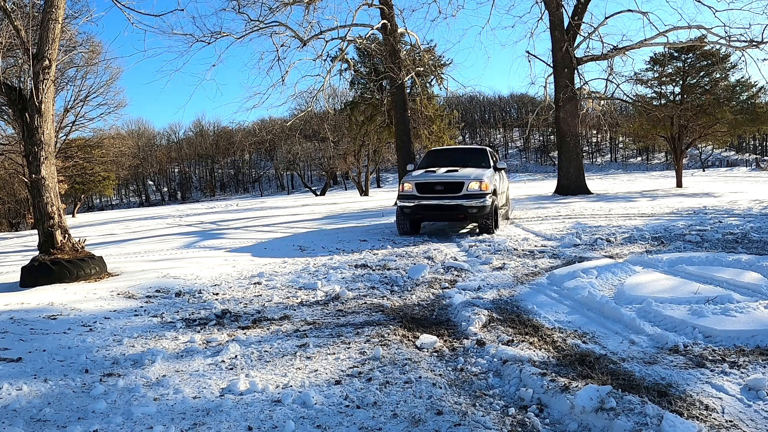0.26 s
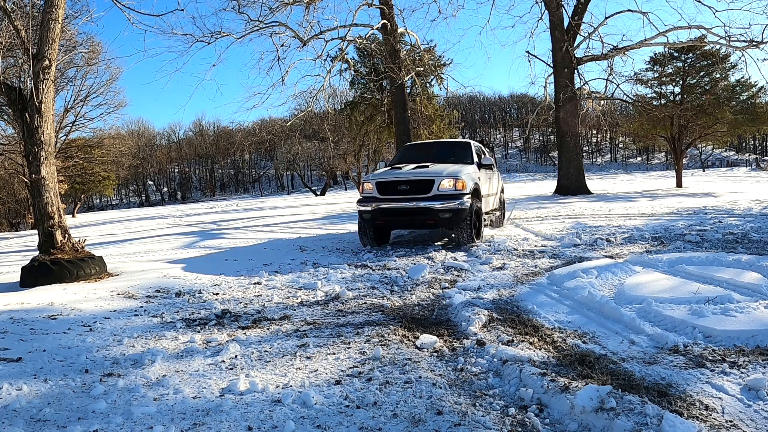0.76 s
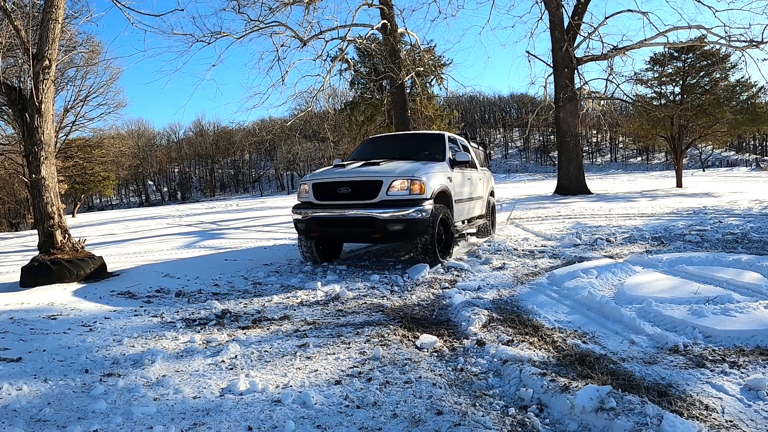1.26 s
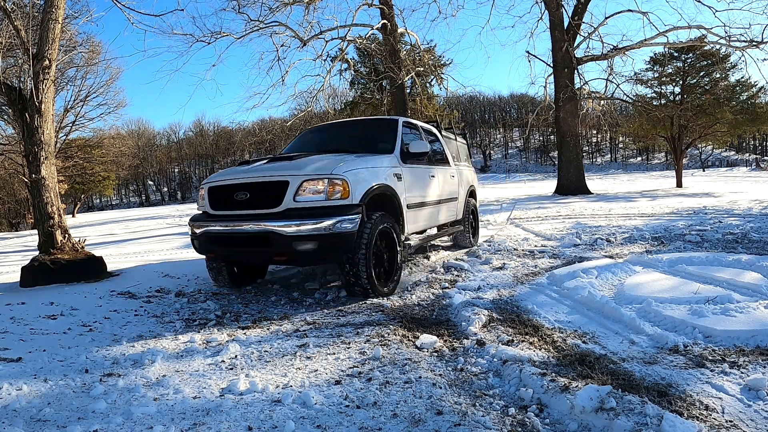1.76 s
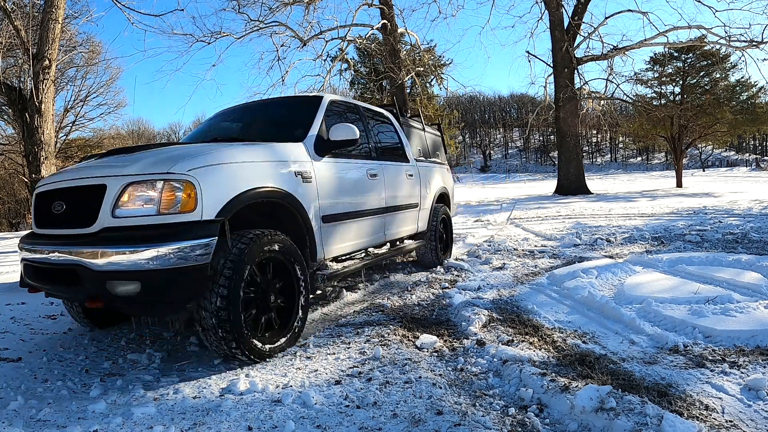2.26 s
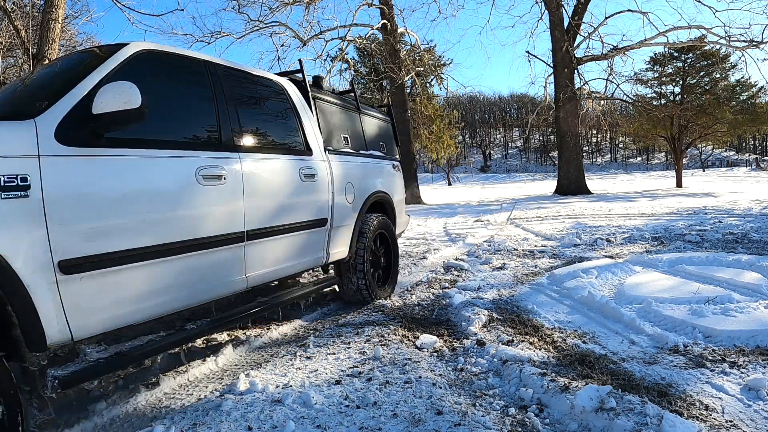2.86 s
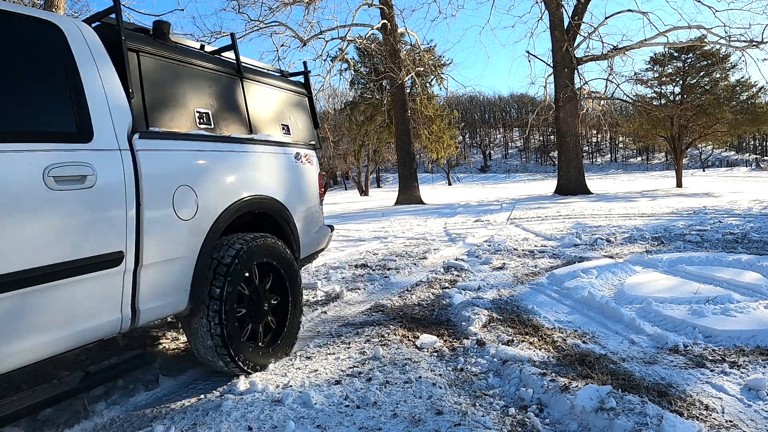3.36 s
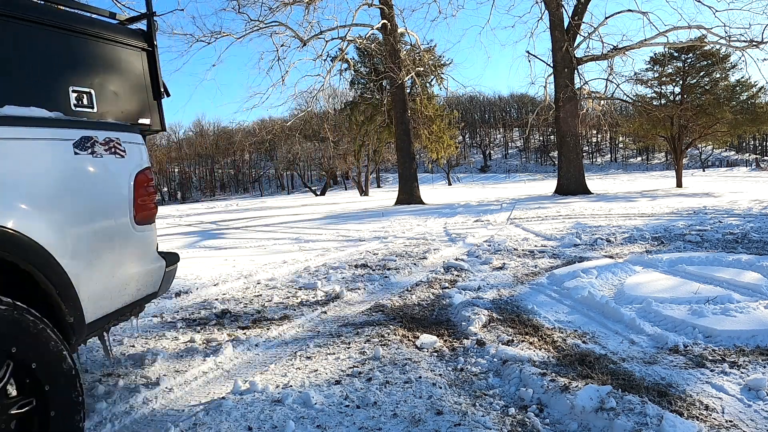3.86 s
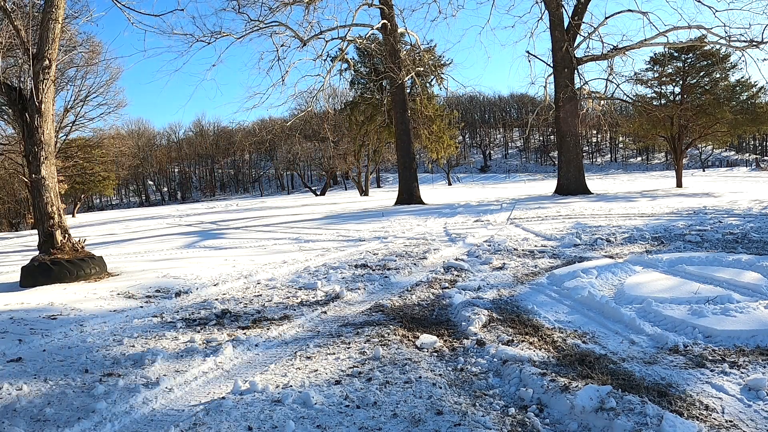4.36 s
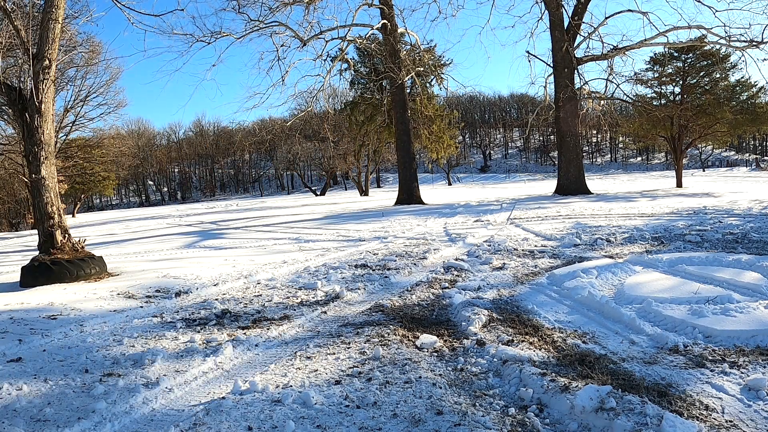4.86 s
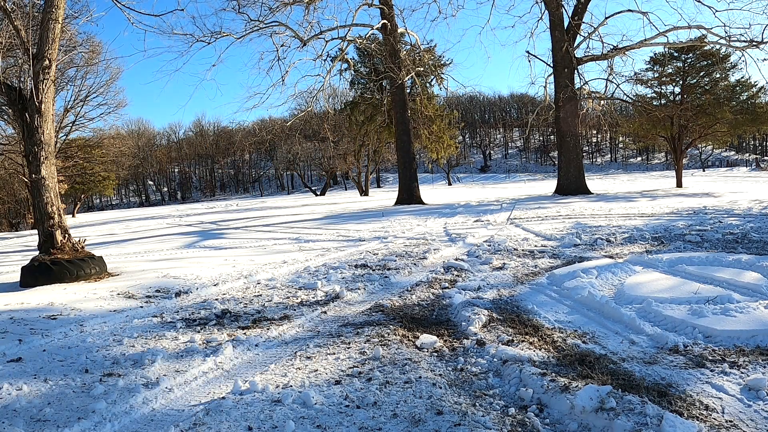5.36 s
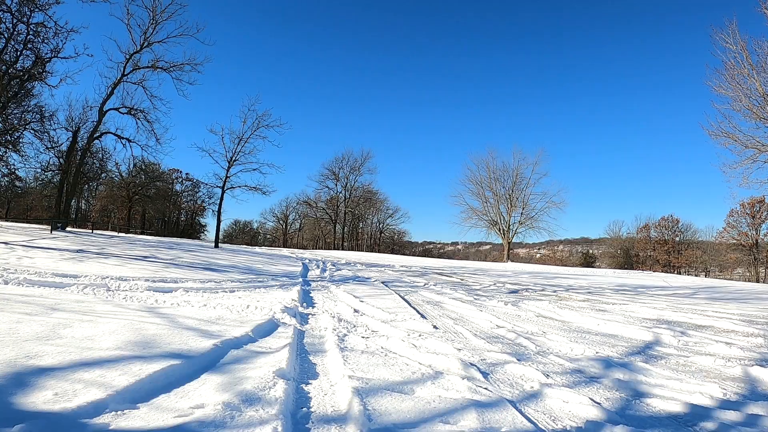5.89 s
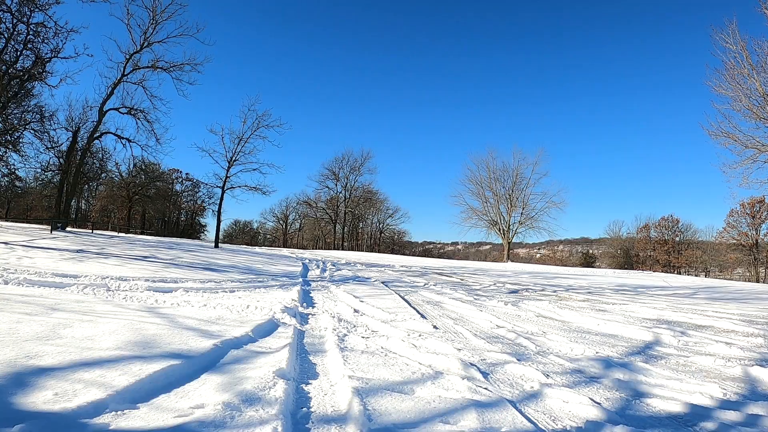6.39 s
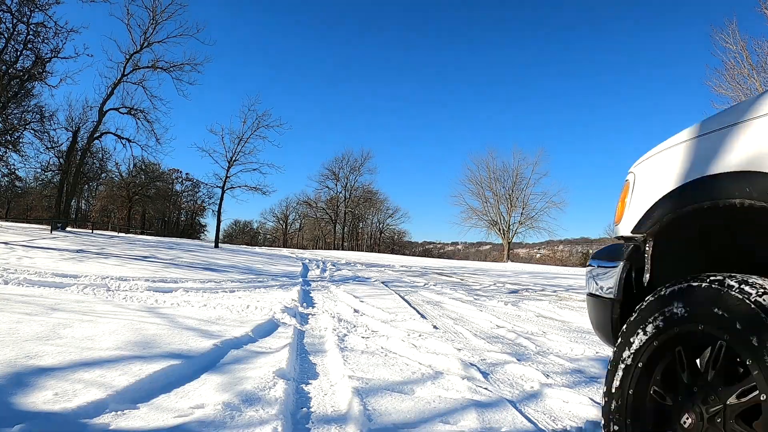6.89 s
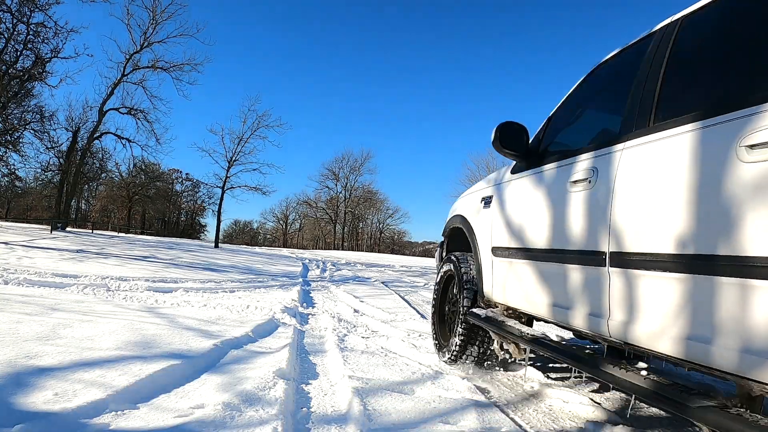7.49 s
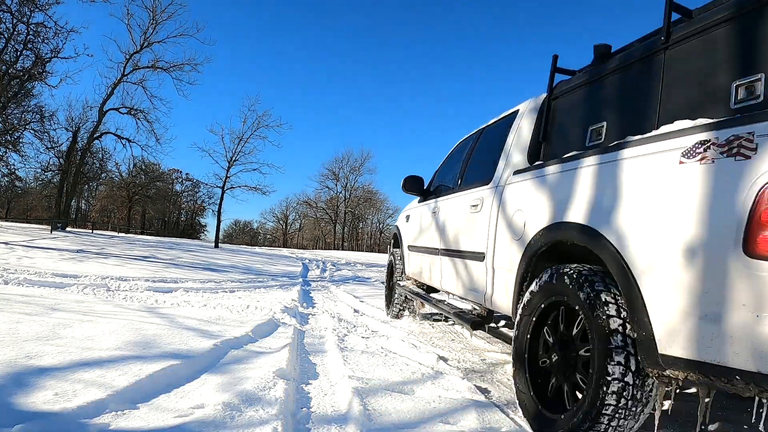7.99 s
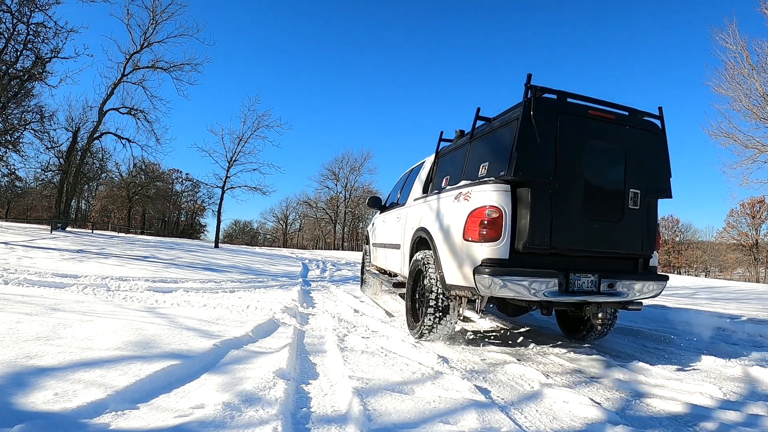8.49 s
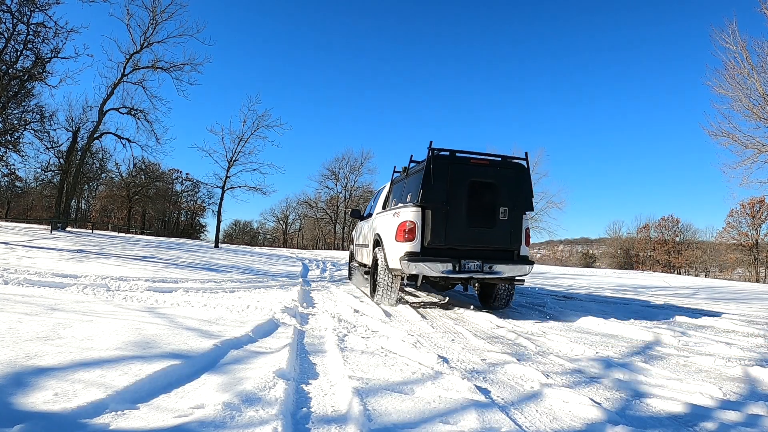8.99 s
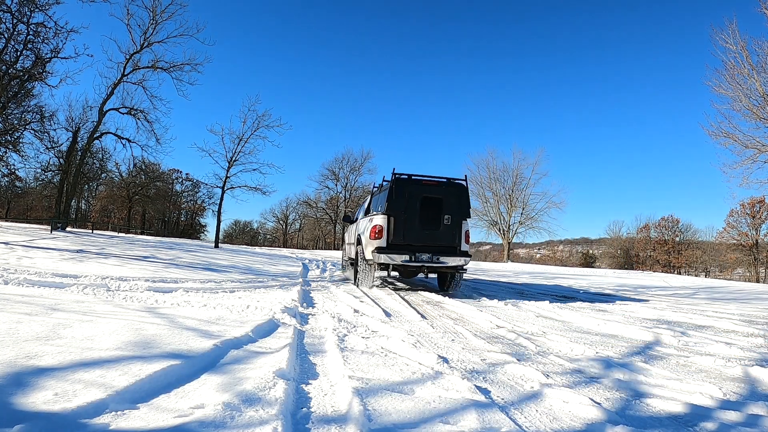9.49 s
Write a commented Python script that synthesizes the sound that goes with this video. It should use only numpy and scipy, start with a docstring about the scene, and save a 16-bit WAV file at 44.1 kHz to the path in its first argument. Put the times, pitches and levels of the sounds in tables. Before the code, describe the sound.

Outdoors on packed snow, a V8 pickup approaches with low exhaust burble, intake drone and gritty tyre crunch. Short raspy wheel squeaks come just before it passes very close to a stereo microphone and moves left. After a brief dip, a second, slightly wider pass swells quickly, with groaning tyres, ice ticks and suspension clacks, then recedes with the engine note falling.

```python
"""At the start a V8 pickup creeps up over packed snow: exhaust burble, intake drone, bay whirr, tyre groan and crunch.
Snow squeals come before 3 s, faint low thumps up to 6 s, ice cracks throughout; a wheel rasps in squeaks from 2 s.
At 3 s the front axle passes about 1.2 m from two close microphone ports; near 5.8 s the level dips briefly.
A second pass follows, abreast at 6.9 s and 2 m off, with suspension clacks after 7 s.
Firing pulses, filtered noise, snow grains and ringing modes make the sounds; distance and bearing place them."""
import sys
import numpy as np
from scipy import signal
from scipy.fft import rfft, irfft, next_fast_len
from scipy.io import wavfile
from scipy.ndimage import map_coordinates

SR = 44100
rng = np.random.default_rng(int(sys.argv[2]) if len(sys.argv) > 2 else 0)


def log_audio(samples):
    """Write samples as a 16-bit WAV file to the path given in sys.argv[1]."""
    # one column per channel
    frames = np.atleast_2d(samples).T
    # limit to full scale, then quantise
    limited = np.clip(frames, -1, 1)
    pcm = np.round(limited * 32767).astype(np.int16)
    wavfile.write(sys.argv[1], SR, pcm)


N = 429534
TIME = np.arange(N) / SR
LEFT_RIGHT = np.array([[1], [-1]])

# path of each pass: front axle abreast t/s, speed/(m/s), closest distance/m
PATH_FIRST = (3.007, 2.78, 1.163)
PATH_SECOND = (6.894, 3.45, 2.01)
WHEELBASE_M = 3.5
# how each source carries: level by front axle/dB, level by rear axle/dB,
# loss per doubling of distance/dB, gain ahead and loss behind/dB
CARRY_FIRST = {"rumble": (-33.5, -39, 3.5, 0), "exhaust": (-31, -37.5, 1.5, -0.6),
               "intake": (-44.5, -78, 6.5, 25), "groan": (-27, -32, 6.5, 3.5),
               "bay": (-36.5, -41.5, 3.5, 7.5), "crunch": (-36.5, -43, 5.5, 6.5),
               "spray": (-42, -44, 9.5, 7.5), "hollow": (-39.5, -53, 4.5, 0.5)}
CARRY_SECOND = {"rumble": (-34.5, -34, 3, -5), "exhaust": (-25, -28, 2.5, 2.5), "intake": (-40, -74, 4, 19),
                "groan": (-22.5, -31.5, 13, 2.5), "bay": (-32.5, -40.5, 10, 7),
                "crunch": (-38.5, -46, 6, 7), "spray": (-50.5, -56.5, 5.5, 0.5),
                "hollow": (-29.5, -33.5, 20.5, -3)}
# bearing at the ports: t/s, left minus right level/dB, left lag/us,
# lean of the band around 1.3 kHz (share, + left), side stream against mid/dB
BEARING_FIRST = [(0, -1.5, 44, 0.013, -7), (2.45, 1, 10.5, 0.019, -10.5), (3.25, 10, -46, 0.088, -3.5),
                 (3.55, 4.5, 1, 0.056, -2.5), (3.87, 4.5, -9, 0.037, -8.5), (4.6, 14.5, -76, 0.37, -3.5),
                 (5.74, 11, -88, 0.85, -4.5)]
BEARING_SECOND = [(5.8, 0, 5, 0.19, -31), (6.4, 0, 11, -0.3, -35), (7.4, -3, 6, -0.26, -16),
                  (8.35, -1.5, -6, -0.74, -12.5), (8.9, -0.1, 1, 0.045, -30), (9.74, 0.1, 0, 0, -34)]
# patches of deeper, crustier or smoother snow: t/s, half length/s, roar/dB, crunch/dB, spray/dB
SNOW_PATCHES = [(0.45, 0.32, 1.2, 2, -1), (1.39, 0.045, -0.5, 1.5, -4), (1.7, 0.31, -1, 1.5, 5),
                (4.004, 0.18, 1.5, 2.5, 1.5), (4.498, 0.18, 1.5, 0.3, -2.5), (6.038, 0.25, 4.5, 5.5, 6),
                (6.152, 0.025, 2.5, -1.5, 0), (6.317, 0.055, 3.5, 0, 0.5), (6.462, 0.04, -1.5, -1.5, -2),
                (6.825, 0.18, -0.5, 3, 5), (6.835, 0.017, 3, -1, -1), (7.034, 0.028, 2, 0, 2),
                (7.094, 0.18, 1.5, 3, 3.5), (7.393, 0.027, -2, -1, 0), (8.06, 0.071, 4, 2, 2),
                (8.42, 0.17, 0, 2.5, -1), (8.87, 0.41, 1.5, 5, 0.5), (9.38, 0.35, -0.5, -3, 0),
                (9.566, 0.055, -16, 0.5, -1)]

# low rumble spectrum: f/Hz, level/dB
RUMBLE_TONE = [(6, -25), (15, -8), (25, 1), (42, 0), (65, 2.5), (85, -6), (130, -40)]
# three short echoes: lag/s
ECHO_LAGS_S = [0.0031, 0.0052, 0.0083]
# hollow ring under the body: f/Hz, width/Hz, level/dB
HOLLOW_MODES = [(523, 88, -7), (695, 78, -4), (780, 130, -1.5), (983, 93, 1.5), (1046, 73, -5.5)]
# faint low thumps: t/s, f/Hz, peak level/dB, rise/s
LOW_THUMPS = [(0.351, 127.7, -30, 0.086), (1.456, 117.7, -23, 0.046), (2.021, 117, -27, 0.028),
              (2.48, 142.6, -24.5, 0.088), (4.271, 109.7, -31, 0.037), (4.73, 47.6, -32, 0.09),
              (4.922, 113, -25, 0.009), (5.01, 124, -21, 0.0049), (5.821, 117.6, -23, 0.035),
              (6.04, 98, -22.5, 0.06)]
# suspension knocks: t/s, level/dB
KNOCKS = [(7.04, -25), (8.3, -29), (8.608, -24), (8.851, -32), (9.188, -38), (9.207, -36), (9.218, -36),
          (9.383, -42)]
# modes of the suspension: f/Hz, level/dB, decay/ms
SUSPENSION_MODES = [(220, 0, 8), (450, -4.5, 6), (680, -6, 6), (984.5, -3.5, 5), (1250, -10, 4.4),
                    (1700, -19, 2), (2600, -20, 1.5)]
# ice cracks under the tread: t/s, tick level/dB, low crack against tick/dB, decay/ms
ICE_CRACKS = [(0.925, -54, 9, 35), (1.228, -48, 9, 25), (1.499, -43.5, 10.5, 15), (1.609, -39, 5, 11),
              (4.326, -36, 5, 4.5), (5.892, -32.5, -9, 3.81), (5.979, -34, -8, 5.3), (6.659, -31, 7.5, 1.8),
              (7.046, -33, 3, 3.6), (7.072, -40, 3, 5), (8.608, -51, -6, 3), (8.963, -39, -7, 10),
              (9.442, -47, -18, 2.26), (9.58, -54, -1, 15.2), (9.628, -53, -12, 14.5)]
# packed snow squeals: t/s, length/s, f/Hz, glide/Hz, level/dB
SNOW_SQUEALS = [(0.738, 0.06, 3300, -100, -49), (1.352, 0.023, 5050, 150, -51),
                (1.366, .026, 4170, -1, -45), (1.362, 0.044, 1355, 0, -40), (1.72, 0.06, 3350, 270, -41.5),
                (2.817, 0.092, 1690, 31, -43)]
# wheel squeaks: t/s, length/s, rasp level/dB, singing level/dB, slip rate/Hz, swell start to end/dB
WHEEL_SQUEAKS = [(2.057, 0.027, -41, -41, 270, 0), (2.13, 0.028, -43, -36, 500, 0),
                 (2.189, 0.057, -32.5, -37, 260, -3), (2.21, 0.014, -37, -32, 390, -2),
                 (2.49, 0.053, -27, -34.5, 330, 5), (2.566, 0.023, -24, -34, 390, -5),
                 (2.592, 0.04, -27.5, -37, 220, -6), (2.706, 0.038, -29.5, -34.5, 260, -4)]
# modes of the wheel: f/Hz, width/Hz, level/dB
WHEEL_MODES = [(1500, 370, 5.5), (2270, 510, 3.5), (3200, 400, 3.5), (3660, 64, 13), (4120, 300, 3),
               (4870, 69, 6), (5230, 90, 2), (6060, 200, 3), (6480, 130, 1), (7470, 93, 9), (7780, 160, 3),
               (8040, 120, 2), (8450, 170, -9)]
SINGING_HZ = 3645  # the mode that the slips lock on to

# spectra of the tyre groan, snow crunch and icy spray: f/Hz, level/dB
GROAN_TONE_FIRST = [(130, 2.5), (235, 3.5), (320, 1), (400, -1.5), (480, -4.5), (600, -5.5), (750, -9),
                    (1100, -20.5), (2500, -59)]
GROAN_TONE_SECOND = [(130, -29), (235, 6.5), (320, 3), (400, 3), (480, 3), (600, -2.5), (750, -5),
                     (1100, -19), (2500, -31.5)]
CRUNCH_TONE_FIRST = [(900, -14), (2000, -1), (2800, -2.5), (3500, -0.5), (4300, -2.5), (5200, -8),
                     (6500, -8.5), (7500, -17), (9000, -17), (15000, -33.5)]
CRUNCH_TONE_SECOND = [(900, -10), (1250, 3.5), (1550, 4), (2000, -1.5), (2600, -3.5), (3200, -7.5),
                      (4400, -7.5), (5500, -16), (6500, -18), (9000, -56), (12000, -64.5)]
ICE_TONE_FIRST = [(5000, -2), (6800, -2), (7600, 2.5), (8200, -6), (9000, -28), (10500, -18),
                  (12500, -14.5), (14000, -38), (15500, -50)]
ICE_TONE_SECOND = [(4500, -9), (5800, -4), (6150, -1.5), (6450, 1), (7100, 4), (7500, -6.5), (8000, -10.5),
                   (10000, -20), (13000, -32), (14500, -40), (16000, -58)]
# spectra of the engine bay, intake and exhaust muffler: f/Hz, level/dB
BAY_TONE_FIRST = [(400, -18.5), (680, -5.5), (830, 1), (990, 0), (1130, 2.5), (1380, -1), (1750, -2.5),
                  (1880, -7.5), (3000, -17), (6000, -41)]
BAY_TONE_SECOND = [(400, -18.5), (740, -1), (850, 4), (985, -2.5), (1070, -1.5), (1170, -7.5),
                   (1350, -18.5), (2000, -25), (3000, -26), (6000, -59)]
INTAKE_TONE = [(70, -22), (100, 6), (122, 10.5), (145, -4), (220, -39.5), (380, -11), (440, -6), (490, -7),
               (570, -6.5), (900, -46)]
MUFFLER_FIRST = [(35, -37), (65, -1), (85, 0.5), (120, 1), (168, 1), (205, -5.5), (300, -18), (600, -30),
                 (1500, -62)]
MUFFLER_SECOND = [(35, -30), (65, -3), (90, 1), (120, 1.5), (165, 3), (235, -6), (320, -13), (600, -41),
                  (1500, -70)]
# eight firings of one engine cycle: strength/dB
CYLINDERS_DB = [0.5, -5.5, 0, -2, 1, -7.5, -2.5, -0.5]
# the engine: t/s, firing rate f/Hz, throttle 0-1
ENGINE_FIRST = [(0, 161, 0), (0.35, 160, 0.2), (0.7, 150, 0.1), (1.1, 167, 0.35), (1.45, 171, 0.47),
                (1.75, 156, 0.2), (2.2, 153, 0.14), (2.72, 151, 0.2), (2.95, 177, 0.6), (3.2, 175, 0.64),
                (3.6, 152.3, 0.22), (4.7, 155, 0), (5.2, 162.8, 0.92), (5.74, 166.1, 0.86)]
ENGINE_SECOND = [(5.799, 160.5, 0.033), (6.85, 158.2, 0.097), (7.25, 161.8, 0.76), (7.451, 152.7, 0.089),
                 (7.8, 150.1, 0.71), (8.1, 165.3, 0.59), (8.5, 159.1, 0.86), (8.75, 146.2, 0.72),
                 (9.15, 138.7, .1), (9.74, 132.1, 0.23)]
THROTTLE_DB = 6  # extra exhaust level at full throttle
LABOUR = 0.35  # share of the roar's change in dB that the exhaust follows
NOTE_DB, NOTE_THROTTLE_DB = -17, 16.5  # clean note against burble when coasting; its rise at full throttle
DRONE_DB = -13  # clean firing note of the intake against its gulping

CHANGE_S = 5.764  # the dip between the passes
TOP_HZ = 15200  # upper limit of the microphone


def undb(db):
    """Decibels to gain."""
    return 10 ** (np.asarray(db) / 20)


def unit(x):
    """Scale to rms 1."""
    return x / np.sqrt(np.mean(x ** 2) + 1e-18)


def curves(table):
    """Each column of a table as a value per sample."""
    s, *columns = np.transpose(table)
    return [np.interp(TIME, s, column) for column in columns]


def colour(x, points):
    """Filter by a spectrum of (Hz, dB) points; rms 1."""
    size = next_fast_len(N, True)
    hz, db = np.transpose(points)
    bins = np.maximum(np.arange(size // 2 + 1) * SR / size, 1)
    gain = undb(np.interp(np.log(bins), np.log(hz), db))
    # beyond the outer points the spectrum falls at 12 dB per octave
    gain *= np.minimum(bins / hz[0], 1) ** 2
    gain *= np.minimum(hz[-1] / bins, 1) ** 2
    return unit(irfft(rfft(x, size) * gain, size)[..., :N])


def lowpass(x, order, hz):
    """Butterworth low-pass."""
    return signal.sosfilt(signal.butter(order, hz, fs=SR, output="sos"), x)


def resonate(x, hz, width_hz):
    """Ring one resonance of the given width."""
    return signal.lfilter(*signal.iirpeak(hz, hz / width_hz, fs=SR), x)


def walk(rate):
    """Smooth chance, changing about rate times a second; rms 1."""
    steps = rng.standard_normal(4096)
    return unit(np.interp(TIME * rate, np.arange(len(steps)), steps))


def grains(rate, spread_db):
    """Two unrelated streams of tiny fractures; a positive spread makes a few strong, a negative one a few weak."""
    chance = rng.random((2, N)) * SR / rate
    strength = np.minimum(-np.log(chance + 1e-12), 6)
    sign = rng.choice([-1, 1], (2, N))
    return (chance < 1) * undb(spread_db * strength) * sign


def stereo(pair, side_db):
    """Mid and side streams to left and right; rms 1."""
    mid, side = pair
    return unit(mid + undb(side_db) * LEFT_RIGHT * side)


def carry(path, source):
    """Gain of a source shared between the two axles: it falls with distance and differs ahead and behind."""
    abreast_s, speed, closest_m = path
    front_db, rear_db, doubling_db, forward_db = source
    power = 0
    for db, setback_m in ((front_db, 0), (rear_db, WHEELBASE_M)):
        along = speed * (TIME - abreast_s) - setback_m
        distance = np.hypot(along, closest_m)
        loss_db = doubling_db * np.log2(distance / closest_m)
        power = power + undb(db - loss_db - forward_db * along / distance) ** 2
    return np.sqrt(power)


def snow_patches():
    """Gains of roar, crunch and spray, swelling or easing as the tyres roll through each patch of snow."""
    swells = np.array([np.exp(-((TIME - s) / half_s) ** 2) for s, half_s, *_ in SNOW_PATCHES])
    changes_db = np.array(SNOW_PATCHES)[:, 2:]
    return undb(changes_db.T @ swells)


def rumble():
    """Low noise, nearly the same on both sides."""
    return stereo(colour(rng.standard_normal((2, N)), RUMBLE_TONE), -39.5)


def echo_ripple(x, echo_db=-19, drift_s=0.0003):
    """Three short echoes with wandering lags put a faint drifting ripple in the noise's spectrum."""
    out = x
    for lag_s in ECHO_LAGS_S:
        at = TIME - lag_s - drift_s * walk(1.5)
        echo = np.array([np.interp(at, TIME, side) for side in x])
        out = out + undb(echo_db) * echo
    return out / np.sqrt(1 + len(ECHO_LAGS_S) * undb(echo_db) ** 2)


def hollow(flutter_db=2.5):
    """Tyre roar rings the gap between the underbody and the packed snow; each resonance flutters on its own."""
    roar, ring = rng.standard_normal(N), 0
    for hz, width, db in HOLLOW_MODES:
        edges = [hz - width / 2, hz + width / 2]
        band = signal.butter(2, edges, "bandpass", fs=SR, output="sos")
        ring = ring + unit(signal.sosfilt(band, roar)) * undb(db + flutter_db * walk(9))
    return unit(ring)


def low_thumps():
    """Faint low thumps, 48 to 143 Hz: each a sine that swells and dies."""
    out = 0
    for start, hz, db, rise_s in LOW_THUMPS:
        t = np.maximum(TIME - start, 0)
        swell = t / rise_s * np.exp(1 - t / rise_s)
        out = out + undb(db) * swell * np.sin(2 * np.pi * hz * t)
    return out


def knocks(detune=0.05):
    """The suspension clacks in the ruts: a hard contact rings its modes, a little differently each time."""
    out, t = np.zeros(N), TIME[:SR // 10]
    for start, db in KNOCKS:
        tail = out[int(start * SR):][:len(t)]
        for hz, mode_db, decay_ms in SUSPENSION_MODES:
            mode_hz = hz * (1 + detune * rng.standard_normal())
            fade = np.exp(-1000 * t / decay_ms)
            tail += undb(db + mode_db) * fade * np.sin(2 * np.pi * mode_hz * t)
    return out


def burst(start, db, decay_s):
    """Envelope of a sudden blow that dies away."""
    out = np.zeros(N)
    tail = out[int(start * SR):][:SR // 4]
    tail += undb(db) * np.exp(-TIME[:len(tail)] / decay_s)
    return out


def ice_cracks():
    """Crust snaps under the tread: a bright noise tick over a lower crack, both dying exponentially."""
    tick = colour(rng.standard_normal(N), ICE_TONE_SECOND)
    snap = colour(rng.standard_normal(N), CRUNCH_TONE_FIRST)
    bright = sum(burst(s, db, ms / 1000) for s, db, low_db, ms in ICE_CRACKS)
    low = sum(burst(s, db + low_db, ms / 1000) for s, db, low_db, ms in ICE_CRACKS)
    return lowpass(tick * bright + snap * low, 4, 7500)


def snow_squeals(waver_hz=40):
    """Brief wavering whistles of snow sliding under rubber."""
    out, waver = np.zeros(N), waver_hz * walk(300)
    for start, length, hz, glide_hz, db in SNOW_SQUEALS:
        span = slice(int(start * SR), int((start + length) * SR))
        progress = (TIME[span] - start) / length
        phase = 2 * np.pi * np.cumsum(hz + glide_hz * progress + waver[span]) / SR
        out[span] += undb(db) * unit(np.sin(np.pi * progress) * np.sin(phase))
    return out


def wheel_squeaks(slip_decay=0.67, edge_s=0.0012, side_db=-11, waver_hz=60, flutter_db=1.5):
    """Stick-slip chatter rasps on a metal part of the wheel, rings its modes and makes one of them sing."""
    rub, singing = np.zeros(N), np.zeros(N)
    unevenness = 1 + 0.45 * walk(200)
    for start, length, rasp_db, tone_db, rate, swell_db in WHEEL_SQUEAKS:
        span = slice(int(start * SR), int((start + length) * SR))
        t = TIME[span] - start
        slip_phase = np.cumsum(rate * unevenness[span] / SR) % 1
        slip = np.exp(-slip_phase / slip_decay)
        edges = np.clip(np.minimum(t, length - t) / edge_s, 0, 1)
        press = undb(swell_db * (t / length - 0.5)) * edges
        rub[span] += undb(rasp_db) * press * unit(slip)
        singing[span] += undb(tone_db) * press * unit(np.sqrt(slip))
    # each slip is a cluster of tiny catches
    force = rub * unit(grains(6000, 1.0))
    ring = sum(undb(db) * resonate(force, hz, width) for hz, width, db in WHEEL_MODES)
    rasp = stereo(lowpass(ring, 8, 8800), side_db) * np.sqrt(np.mean(rub ** 2))
    phase = 2 * np.pi * np.cumsum(SINGING_HZ + waver_hz * walk(250)) / SR
    song = unit(np.sin(phase) * undb(flutter_db * walk(150)))
    return rasp + song * singing


def groan(tone, side_db, ruts_db, tread_db):
    """Snow packing under the tyres: dense grains in a low band, uneven at a slow and a faster rate."""
    uneven = unit(undb(ruts_db * walk(9) + tread_db * walk(38)))
    return stereo(colour(grains(3000, 0.92), tone), side_db - 9.5) * uneven


def crunch_and_spray(crunch_tone, ice_tone, side_db, grain_db):
    """The snow gives way in lumps as the tread blocks press on it: fine crunch and brighter icy spray."""
    lumps = unit(undb(walk(45)))
    crunch = stereo(colour(grains(9000, grain_db) * lumps, crunch_tone), side_db)
    spray = stereo(colour(grains(11000, grain_db) * lumps, ice_tone), side_db - 0.5)
    return crunch, spray


def engine_bay(firings, tone, side_db):
    """Fan and valve gear whirr: noise that pulses with the firings and flutters a little."""
    pulsing = 1 + 0.05 * np.cos(2 * np.pi * firings)
    whirr = rng.standard_normal((2, N)) * pulsing * undb(walk(60))
    return stereo(colour(whirr, tone), side_db - 16.0)


def intake(firings, air_db=7, gulp_decay=0.066):
    """Each cylinder gulps air in turn and rings the intake tract, over a steady drone at the firing rate."""
    strength = undb(CYLINDERS_DB)[firings.astype(int) % len(CYLINDERS_DB)]
    gulps = strength * np.exp(-(firings % 1) / gulp_decay)
    air = colour(rng.standard_normal(N), INTAKE_TONE)
    rough = unit(colour(gulps - gulps.mean(), INTAKE_TONE) + undb(air_db) * air)
    drone = unit(np.sin(2 * np.pi * firings))
    return unit(rough + undb(DRONE_DB) * drone)


def exhaust(firings, note_db, muffler, scatter=0.42, gas_db=-0.5, waver_db=1.9):
    """Uneven firings and turbulent gas boom through the muffler, with a clean note at the firing rate."""
    fired = np.flatnonzero(np.diff(np.floor(firings)) > 0)
    chance = 1 + scatter * rng.standard_normal(len(fired))
    strength = np.resize(undb(CYLINDERS_DB), len(fired)) * chance
    # the differences between the cylinders make the burble, their common beat the note
    pulses = np.zeros(N)
    pulses[fired] = strength - strength.mean()
    gas = undb(gas_db) * rng.standard_normal(N)
    burble = colour(unit(pulses) + gas, muffler)
    note = unit(np.sin(2 * np.pi * firings) * undb(waver_db * walk(7)))
    return (burble + undb(note_db) * note) / np.hypot(1, undb(note_db))


def drive_by(path, sources, pipe, firings, groan_tone, bay_tone, crunch_tone, ice_tone,
             grain_db, ruts_db, tread_db):
    """One pass of the truck: each source carries over its changing distance and the snow patches shade it."""
    gain = {name: carry(path, source) for name, source in sources.items()}
    roar, crust, loose = snow_patches()
    *_, side_db = curves(BEARING_FIRST + BEARING_SECOND)
    low = rumble() * gain["rumble"]
    ring = stereo([hollow(), hollow()], side_db - 2) * gain["hollow"]
    tyres = groan(groan_tone, side_db, ruts_db, tread_db) * gain["groan"]
    crunch, spray = crunch_and_spray(crunch_tone, ice_tone, side_db, grain_db)
    crunch, spray = crunch * gain["crunch"], spray * gain["spray"]
    bay = engine_bay(firings, bay_tone, side_db) * gain["bay"]
    # deeper snow makes the engine labour too
    engine = pipe * gain["exhaust"] * roar ** LABOUR + intake(firings) * gain["intake"]
    rippled = echo_ripple(roar * bay + crust * crunch + loose * spray)
    return low + roar * (tyres + ring) + rippled + engine


def ports(x, shadow_hz=(480, 6500), lean_hz=1300, lean_width_hz=700):
    """Two close ports: the far one is shaded and late; a band around 1.3 kHz leans aside with a phase shift."""
    pan_db, lag_us, lean, _ = curves(BEARING_FIRST + BEARING_SECOND)
    band = signal.butter(2, shadow_hz, "bandpass", fs=SR, output="sos")
    middle = signal.sosfiltfilt(band, x)
    leaning = resonate(x, lean_hz, lean_width_hz)
    # tanh splits the level difference between the two ports
    pan = np.tanh(pan_db * np.log(10) / 20 / 2)
    shaded = x + LEFT_RIGHT * (middle * pan + leaning * lean)
    heard_at = (TIME - LEFT_RIGHT * lag_us * 1e-6 / 2) * SR
    return np.array([map_coordinates(side, [at], order=3, mode="nearest")
                     for side, at in zip(shaded, heard_at)])


def scene():
    """The throttle drives the exhaust; the first pass fades out quickly and the second comes in."""
    firing_hz, throttle = curves(ENGINE_FIRST + ENGINE_SECOND)
    firings = np.cumsum(firing_hz * (1 + 0.00614 * walk(22))) / SR  # running count
    note_db = NOTE_DB + NOTE_THROTTLE_DB * throttle
    push = undb(THROTTLE_DB * throttle)
    first = drive_by(PATH_FIRST, CARRY_FIRST, push * exhaust(firings, note_db, MUFFLER_FIRST), firings,
                     GROAN_TONE_FIRST, BAY_TONE_FIRST, CRUNCH_TONE_FIRST, ICE_TONE_FIRST,
                     grain_db=1.0, ruts_db=0.85, tread_db=1.0)
    second = drive_by(PATH_SECOND, CARRY_SECOND, push * exhaust(firings, note_db, MUFFLER_SECOND), firings,
                      GROAN_TONE_SECOND, BAY_TONE_SECOND, CRUNCH_TONE_SECOND, ICE_TONE_SECOND,
                      grain_db=-1.5, ruts_db=0.67, tread_db=1.5)
    fade_out = np.clip((CHANGE_S - TIME) / 0.023, 0, 1) ** 3
    fade_in = np.clip((TIME - CHANGE_S) / 0.041, 0, 1) ** 2
    passes = first * fade_out + second * fade_in
    events = low_thumps() + knocks() + ice_cracks() + snow_squeals() + wheel_squeaks()
    ends = np.clip(np.minimum(TIME, TIME[-1] - TIME) / 0.004, 0, 1)
    return ends * ports(passes + events)


def record(dry):
    """The microphone cuts the top with a steep elliptic low-pass."""
    return signal.sosfilt(signal.ellip(8, 0.2, 70, TOP_HZ, fs=SR, output="sos"), dry)


dry = scene()
out = record(dry)
log_audio(out)
```